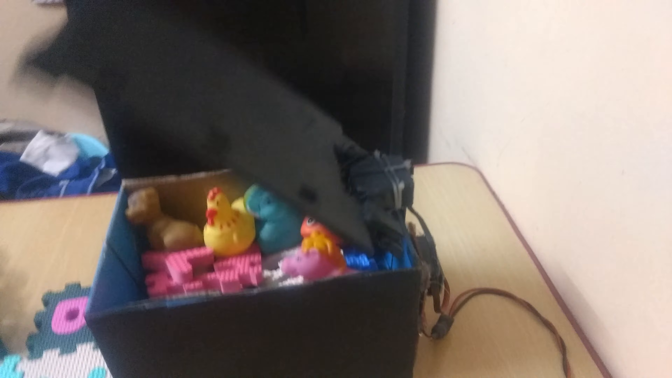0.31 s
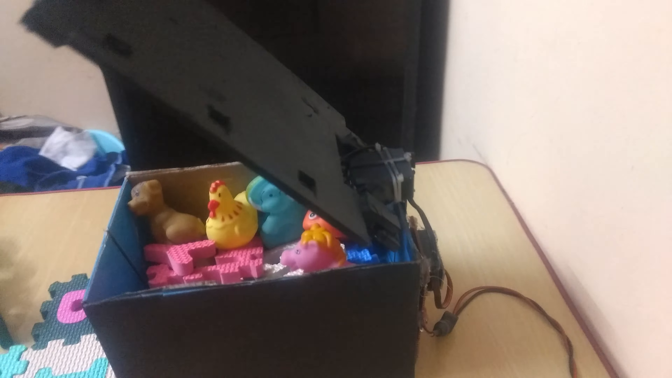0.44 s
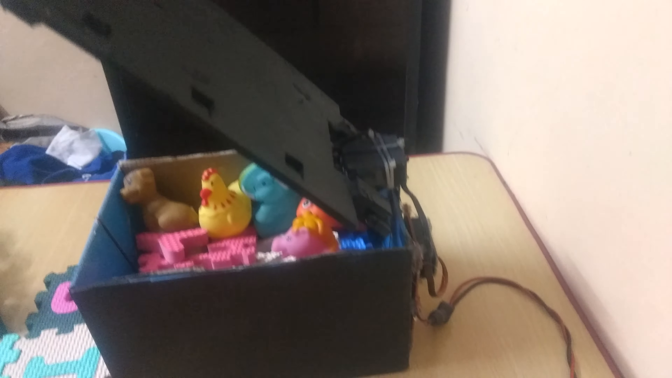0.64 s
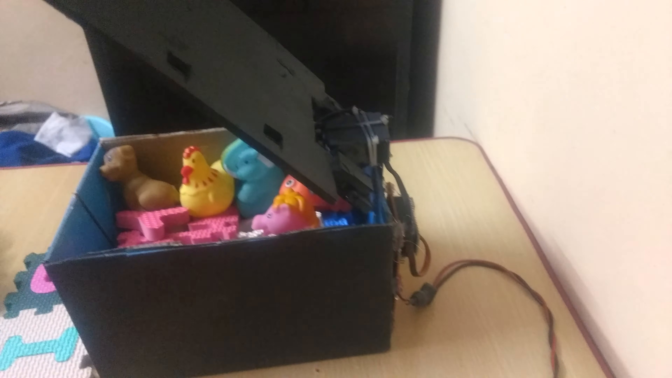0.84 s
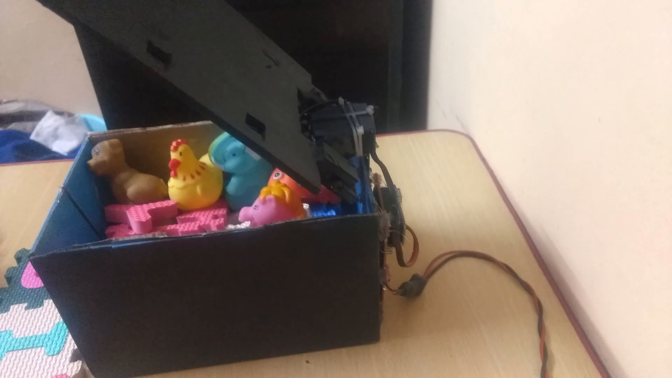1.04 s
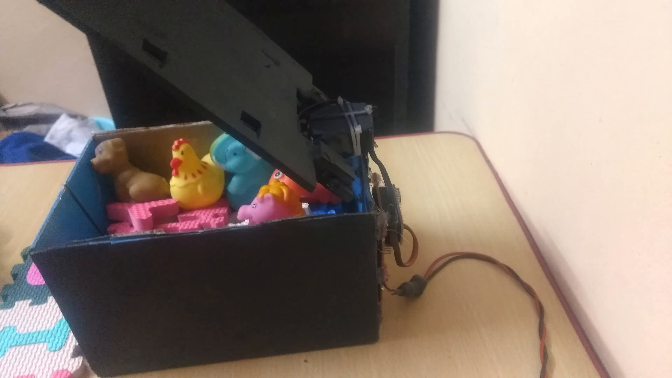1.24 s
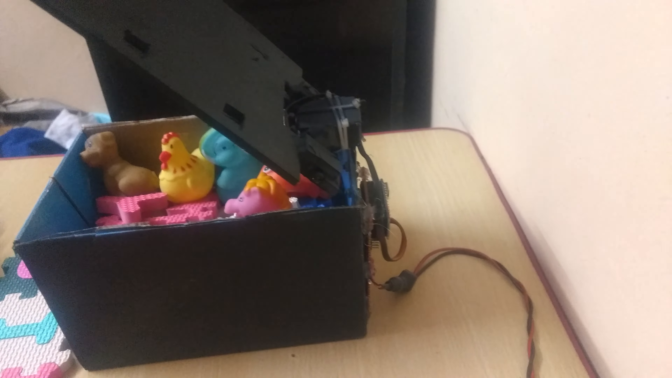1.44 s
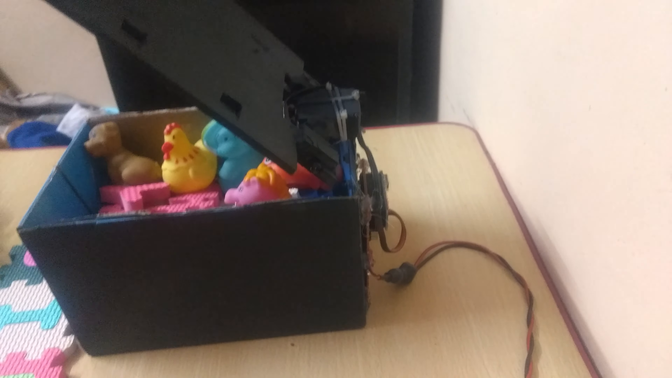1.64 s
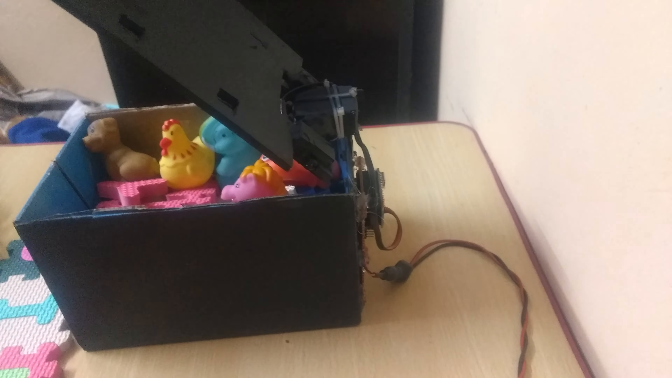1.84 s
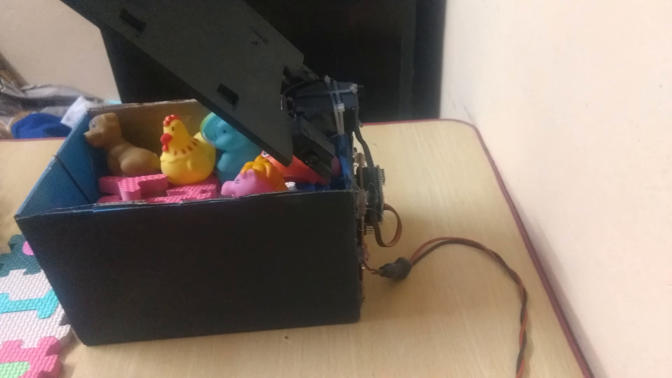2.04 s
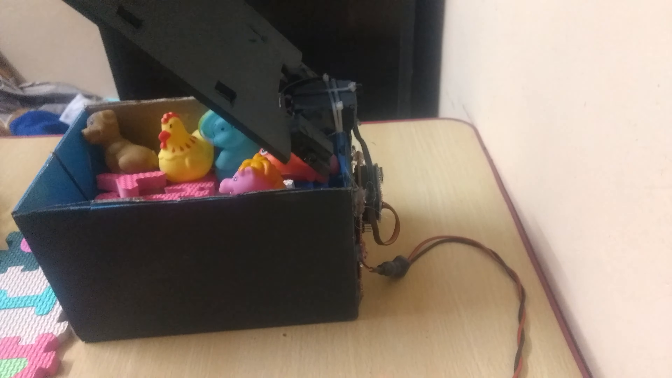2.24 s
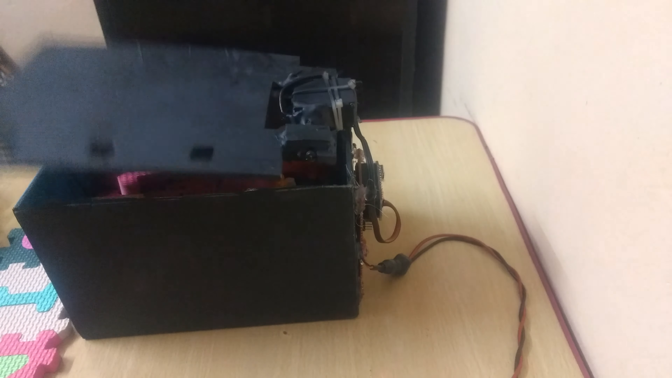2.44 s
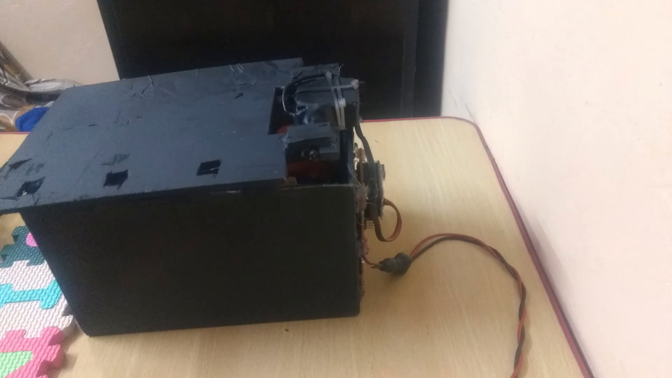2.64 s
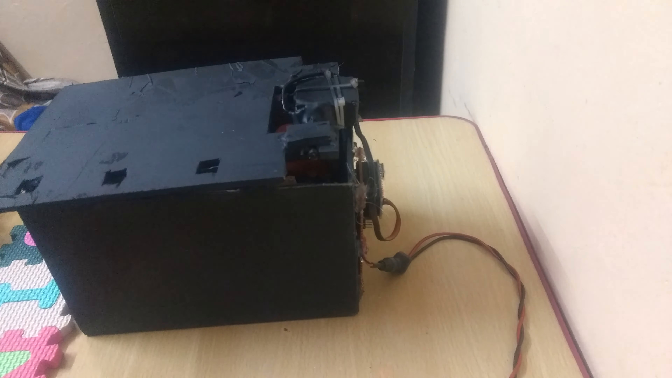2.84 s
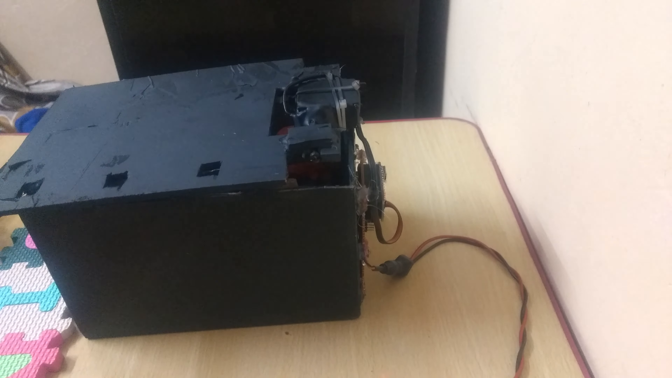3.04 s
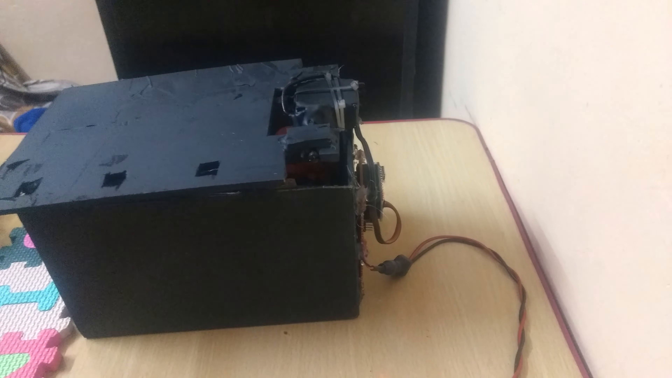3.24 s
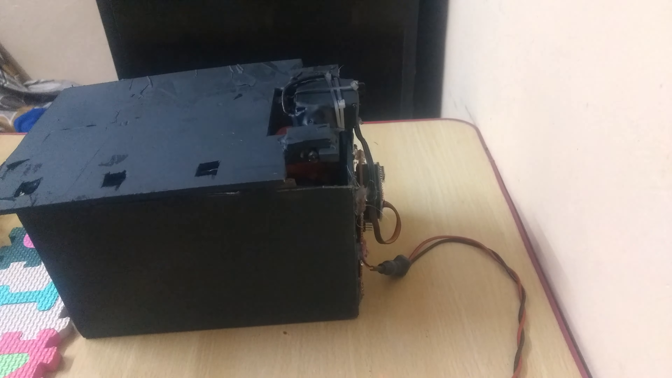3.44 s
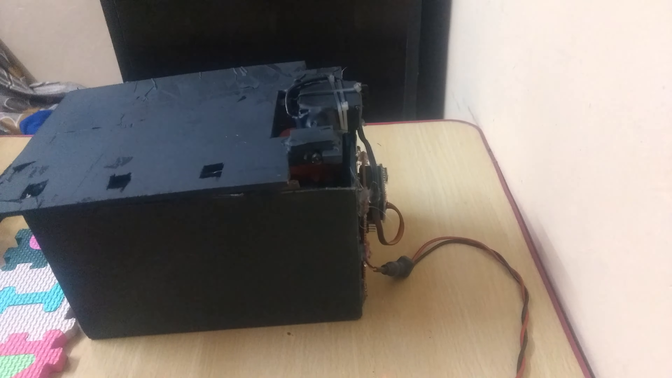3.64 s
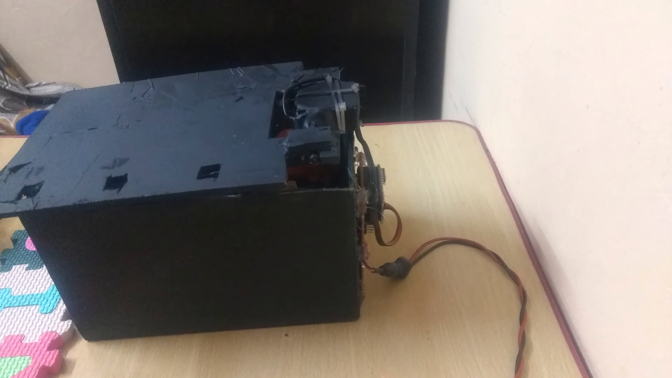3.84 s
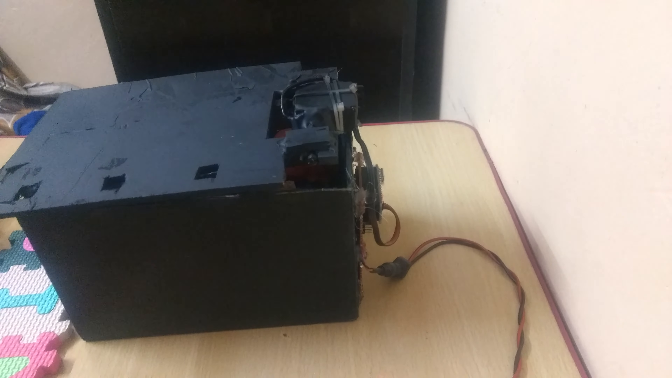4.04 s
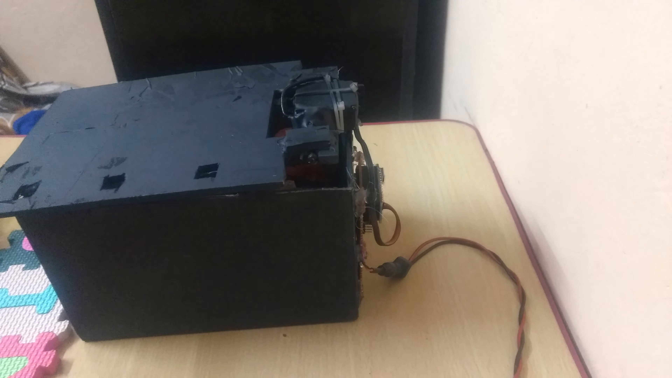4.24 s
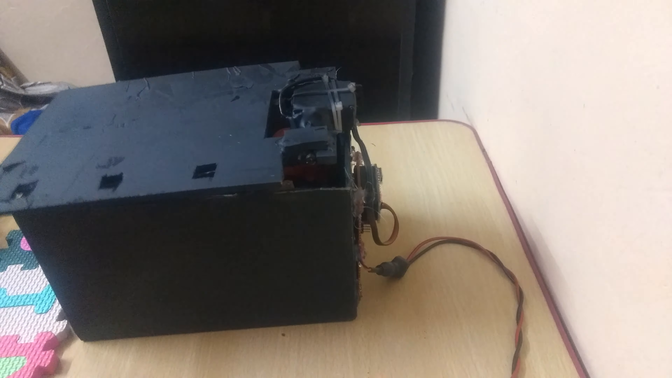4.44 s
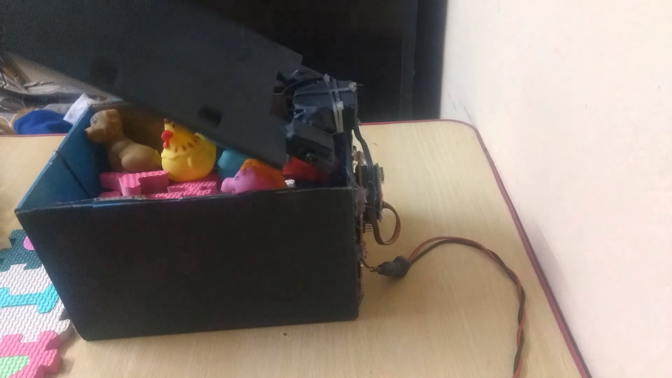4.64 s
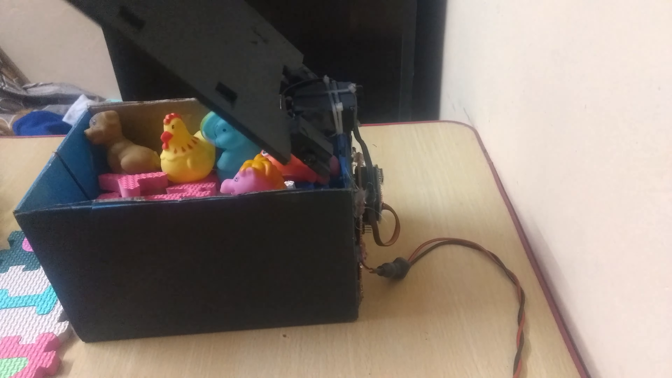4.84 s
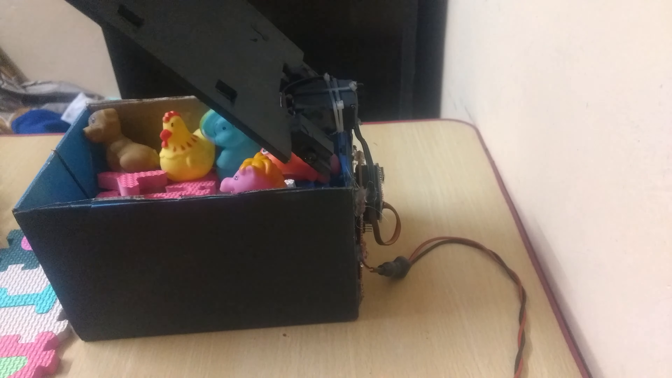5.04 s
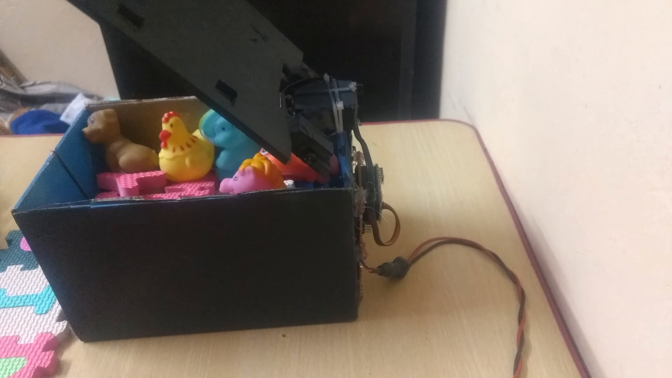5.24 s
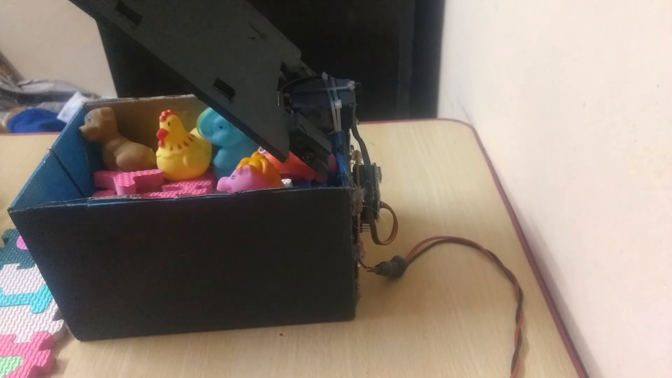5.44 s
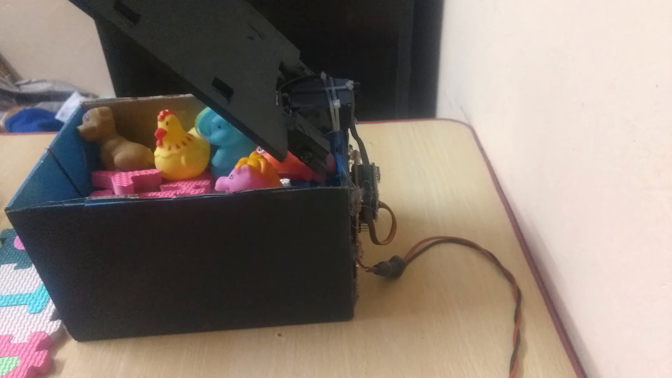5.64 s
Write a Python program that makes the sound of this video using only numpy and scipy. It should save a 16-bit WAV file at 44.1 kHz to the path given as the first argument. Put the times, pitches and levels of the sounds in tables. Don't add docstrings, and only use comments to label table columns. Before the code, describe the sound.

A tiny gear motor zips a hollow cardboard box lid at the start, grinds lower in the middle and zips again near the end. Fine, regular hinge ticks follow the first and last bursts. Low fan hum and thin hiss continue throughout, dipping slightly after the louder bursts, captured close by a phone in a small room.

```python
import sys
import numpy as np
from scipy import signal
from scipy.fft import rfft, irfft, next_fast_len
from scipy.io import wavfile
from scipy.ndimage import uniform_filter1d, map_coordinates

SR = 44100
rng = np.random.default_rng(int(sys.argv[2]) if len(sys.argv) > 2 else 0)


def volts(x):
    e = np.asarray(x, float) / 20
    return 10 ** e


def file_out(sig):
    cols = np.atleast_2d(sig).T
    lim = np.clip(cols, -1, 1)
    pcm = np.round(lim * 32767).astype(np.int16)
    wavfile.write(sys.argv[1], SR, pcm)


N = 251362

# [t/s, rasp level/dB]
EFFORT = [
    [(.07, -60), (.084, -40), (.124, -26), (.17, -26.5), (.215, -36), (.25, -34), (.325, -32.5),
     (.42, -45.5), (.56, -82)],
    [(2.27, -73), (2.28, -41), (2.306, -34), (2.372, -41.5), (2.4, -37), (2.416, -27.5), (2.47, -31),
     (2.575, -38), (2.76, -95)],
    [(4.47, -91), (4.478, -44.5), (4.516, -24), (4.566, -26), (4.61, -35), (4.64, -31.5), (4.75, -31),
     (4.79, -39.5), (4.97, -76.5)],
]
# [f/Hz, likeness/-1..1, phase lead of the first/rad,
# first over second for the room/dB, the same for the servo/dB]
PORTS = [(40, .99, .16, 1.7, 1.7), (90, .985, .19, .8, .8), (170, .995, .17, -.2, -.2),
         (300, .94, .17, -2.4, -2.5), (550, .88, .2, -2.2, -3.5), (950, .45, .2, -2.5, -1.6),
         (1600, -.2, 0, -1, 0), (3000, 0, 0, -1, -1), (7000, 0, 0, -1.5, -1), (11000, 0, 0, -4, -5),
         (15000, 0, 0, -3, -18)]


def servo():
    # [f/Hz, level/dB per Hz]
    case_spectrum = [(1100, -120), (1200, -4), (1450, -7), (1650, 3.5), (1900, -2), (2150, 2), (2600, -1),
                     (3200, -6.5), (4300, -10), (5500, -8.5), (6500, -13.5), (8000, -16), (9000, -29),
                     (10000, -120)]
    # [f/Hz, level/dB per Hz]
    sizzle_spectrum = [(7500, -120), (8500, -3), (9500, -15.5), (10500, -8), (13200, -12.5), (14000, -8),
                       (15500, -4)]
    # [f/Hz, width/Hz, level/dB]
    box_walls = [(514.4, 15.5, 5.5), (670.6, 58, 4.5), (808, 176, -4.5), (937, 32, 0.5), (1076, 94, -5.5)]
    rasp_db, = curves(EFFORT)
    age, mesh_hz, pull, top_hz, whine_db, drum_db = motor()

    lumps = volts(2 * wobble(350) + 1.2 * wobble(60))
    grit = lambda: lumps * rng.standard_normal((2, N))
    labour_khz = (top_hz.max() - top_hz) / 1000
    sizzle_db = -14.5 + 3 * pull + 5.5 * labour_khz
    rasp = coloured(grit(), case_spectrum) + volts(sizzle_db) * coloured(grit(), sizzle_spectrum)

    box_db = drum_db - 4 - pull + 10 * (age - .2) - 0.66 * np.clip(rasp_db + 33, 0, None)
    drum = volts(box_db + 1.1 * wobble(70)) * resonant(grit(), box_walls)

    gears_db = rasp_db + 3 - 2.5 * pull
    gears = volts(gears_db) * (rasp + drum)
    return swinging(EFFORT, fall_s=.05) * (gears + whine(mesh_hz, pull, rasp_db + whine_db + 2 * pull))


def motor():
    # [motor starts t/s, brakes t/s, mesh pitch it heads for f/Hz]
    swings = [
        (.085, .26, 1720),
        (2.275, 2.52, 920),
        (4.485, 4.7, 1700),
    ]
    # [whine re rasp/dB, box drumming re rasp/dB]
    loads = [
        (-4.5, -4.5),
        (-2, 1),
        (-6.5, 0),
    ]
    spin_up_s, creep_hz_per_s, sag_hz_per_s = .042, 700, 3800
    pull_s, pull_hz = 0.13, 1400
    t = np.arange(N) / SR
    rows = np.hstack([swings, loads])
    current = np.clip(np.searchsorted(rows[:, 0], t) - 1, 0, None)
    start, brake, top_hz, whine_db, drum_db = rows[current].T
    age = np.clip(t - start, 0, None)
    run_up = top_hz * (1 - np.exp(-age / spin_up_s))
    mesh_hz = run_up + creep_hz_per_s * age - sag_hz_per_s * np.clip(t - brake, 0, None)
    pull = (top_hz > pull_hz) * np.clip((pull_s - age) / .02, 0, 1)
    return np.clip(age, 0, .5), np.clip(mesh_hz, 1, None), pull, top_hz, whine_db, drum_db


def whine(mesh_hz, pull, first_db):
    # [f/Hz, level/dB]
    case_gain = [(700, -20), (1100, -3), (1620, 3), (1900, 1), (2300, 4), (3200, 3), (3500, -10), (6300, 0)]
    # [multiple of the mesh pitch, level re octave/dB]
    overtones = [
        (3, -8),
        (4, -6),
        (5, -17),
    ]
    # [t/s, half length/s, level/dB]
    singing = [
        (.325, .016, 4),
        (2.46, .025, 2),
        (4.62, .03, 3),
        (4.7, .04, 1),
    ]
    t = np.arange(N) / SR
    cruise = 1 - pull
    wavering_hz = mesh_hz * (1 + (.004 + .007 * cruise) * wobble(120))
    phase = 2 * np.pi * np.cumsum(wavering_hz) / SR

    def tone(k, db):
        level = volts(db + along(case_gain, k * mesh_hz))
        flutter = volts(2 * np.array([wobble(60), wobble(60)]))
        return level * flutter * np.sin(k * phase + rng.uniform(0, 2 * np.pi, (2, 1)))

    octave_db = first_db + 1 - 14 * cruise
    fade_db = np.clip(mesh_hz - 1520, 0, None) / 10
    upper = sum(tone(k, octave_db + db - fade_db) for k, db in overtones)
    spells = pull * np.interp(mesh_hz, (500, 1300), (0, 1))
    spells = spells + sum(volts(db) * np.exp(-((t - s) / half) ** 2) for s, half, db in singing)
    return (mesh_hz > 500) * spells * (tone(1, first_db) + tone(2, octave_db) + upper)


def lid():
    # [t/s, peak/dB, body re peak/dB, back-swing peak/dB]
    rock_ticks = [(.486, -53, 1, -58), (.6538, -62, 9, -58), (.8239, -53, 3, -55.5),
                  (1.007, -48.5, -19, -61), (1.1817, -51.5, -18, -75), (1.3527, -49.5, -1, -78),
                  (1.525, -55.5, -16, -78), (4.871, -50, -2, -65), (5.046, -49.5, 0, -57),
                  (5.224, -58, 10, -57), (5.4, -54, -5, -66), (5.5767, -51, -13, -75)]
    # [t/s, peak/dB, body re peak/dB]
    stray_slips = [
        (.4754, -51, -3),
        (0.6876, -61, 16),
        (.847, -58, -9),
        (5.2154, -56, -9),
    ]
    # [t/s, peak/dB, low knock re peak/dB]
    gear_knocks = [(0.0815, -34.5, -6), (0.605, -70, 26), (2.2807, -48, 12), (2.3047, -55, 0),
                   (2.3347, -43, 11), (2.3484, -41, 18), (2.3883, -39, 9), (2.4084, -29, -12),
                   (2.6917, -59.5, 10), (2.8135, -65, 9), (4.4804, -49, 2), (4.9094, -59, 7),
                   (4.9576, -62, 11.5)]
    lead_s, back_s = .017, .093
    rocks = []
    for s, db, body_db, back_db in rock_ticks:
        rocks += [(s - lead_s, -61, -2), (s, db, body_db), (s + back_s, back_db, -2)]
    ticks = clicks(rocks + stray_slips, (6500, 20000), (2500, 5000), top_s=.0029, body_s=.0064, gain_db=8.5)
    return ticks + clicks(gear_knocks, (2500, 9000), (800, 2500), top_s=.015, body_s=.04, gain_db=6)


def clicks(events, top, body, top_s, body_s, gain_db):
    bright, dull = np.zeros((2, N + SR)), np.zeros((2, N + SR))
    t = np.arange(SR // 10) / SR
    for s, db, body_db in events:
        puff = rng.standard_normal((2, 2, len(t)))
        puff = puff / np.sqrt(np.mean(puff[..., :SR // 1000] ** 2, -1, keepdims=True))
        span = slice(round(s * SR), round(s * SR) + len(t))
        bright[:, span] += volts(db + gain_db - 60 * t / top_s) * puff[0]
        dull[:, span] += volts(db + body_db + gain_db - 60 * t / body_s) * puff[1]
    return filtered(bright[:, :N], band(*top)) + filtered(dull[:, :N], band(*body))


def room():
    # [f/Hz, level/dB per Hz]
    fan_spectrum = [(25, -41), (38, -26), (50, -12), (65, -20), (100, -6.5), (130, -15), (230, -5.5),
                    (300, -5), (430, -15), (550, -8), (750, -9), (1300, -19), (2200, -24.5), (4000, -120)]
    # [f/Hz, width/Hz, level/dB]
    housing = [(170.9, 38.2, 0)]
    # [t/s, level/dB]
    hum_swells = [(.13, -50), (1.03, -44), (2.16, -46), (2.428, -35), (3.98, -42), (4.54, -44.5), (4.7, -48),
                  (5.46, -44), (5.56, -42)]
    # [f/Hz, level/dB per Hz]
    air_spectrum = [(700, -120), (1200, -18), (1800, 4), (2500, 2.5), (3200, -1.5), (4500, -12.5),
                    (6500, -32), (9000, -51), (12000, -120)]
    # [f/Hz, level/dB per Hz]
    hiss_spectrum = [(2000, -120), (4000, -3), (5000, -4), (6400, -8), (7100, -2), (7500, -4), (8000, -11),
                     (9500, -14), (11500, -13), (13500, -10), (15500, -8)]
    t, duck_db = np.arange(N) / SR, ducking()
    noise = lambda: rng.standard_normal((2, N))
    rush = volts(-44 + duck_db + 0.73 * wobble(8)) * coloured(noise(), fan_spectrum)

    carrier = resonant(resonant(noise(), housing), housing)
    power = np.abs(uniform_filter1d(np.mean(carrier ** 2, 0), SR // 15))
    steady = carrier / np.sqrt(0.16 + power)
    throb = volts(-45 + duck_db + 2 * wobble(15))
    throb = throb + sum(volts(db) * np.exp(-((t - s) / 0.024) ** 2) for s, db in hum_swells)
    hum = filtered(volts(0.5) * throb * steady, band(80, 310))

    air = volts(-61 + 0.62 * duck_db + .6 * wobble(12)) * coloured(noise(), air_spectrum)
    hiss = volts(-70.275 + 0.51 * duck_db) * coloured(noise(), hiss_spectrum)
    return rush + hum + air + hiss


def ducking():
    lost_db = [7.5, 7.5, 1]
    recover_s = 0.28
    t, gain_db = np.arange(N) / SR, np.zeros(N)
    for rows, db in zip(EFFORT, lost_db):
        a, b = rows[0][0], rows[-1][0]
        gain_db -= db * np.clip((t - a) / (b - a), 0, 1) * np.exp(-np.clip(t - b, 0, None) / recover_s)
    return gain_db


def far():
    # [t/s, level/dB, low f/Hz, high f/Hz, t60/s]
    distant = [
        (.655, -54, 6500, 9000, .7),
        (1.606, -46, 1000, 5000, .35),
        (1.607, -49, 2200, 5000, 1.8),
        (1.606, -62, 10000, 14000, .6),
        (1.62, -49, 900, 3500, .2),
        (1.701, -44, 450, 1700, .06),
        (3.134, -45, 450, 1700, .06),
        (4.097, -43, 450, 1700, .06),
    ]
    t, lumps_db = np.arange(N) / SR, 2.5 * wobble(70)
    sound = np.zeros((2, N))
    for s, db, lo_hz, hi_hz, t60 in distant:
        level = (t > s) * volts(db + lumps_db - 60 * np.abs(t - s) / t60)
        tail = level * rng.standard_normal((2, N))
        sound += filtered(tail, lambda hz: band(lo_hz, hi_hz)(hz) ** 2)
    return sound


def whistles():
    # [f/Hz, level/dB]
    leaks = [(2900, -82), (10002, -97), (13582, -99), (14002, -94)]
    t, sound = np.arange(N) / SR, np.zeros((2, N))
    for hz, db in leaks:
        level = np.sqrt(2) * volts(db + 0.91 * wobble(3.1))
        sound += level * np.sin(2 * np.pi * hz * t + rng.uniform(0, 2 * np.pi, (2, 1)))
    return sound


def ports(pair, col):
    turn = lambda hz: np.arccos(np.clip(along(PORTS, hz), -1, 1)) / 2
    mid, side = filtered(pair, lambda hz: np.array([np.cos(turn(hz)), np.sin(turn(hz))]))
    half = np.array([[.5], [-.5]])
    level = lambda hz: volts(half * along(PORTS, hz, col=col))
    lead = lambda hz: np.exp(1j * half * along(PORTS, hz, col=2))
    return filtered(np.array([mid + side, mid - side]), lambda hz: level(hz) * lead(hz))


def swinging(tables, fall_s):
    t, gate = np.arange(N) / SR, np.zeros(N)
    for rows in tables:
        gate += np.clip((t - rows[0][0]) / .008, 0, 1) * np.clip((rows[-1][0] - t) / fall_s, 0, 1)
    return np.clip(gate, 0, 1)


def unit(x):
    return x / np.sqrt(np.mean(x ** 2) + 1e-20)


def along(points, hz, col=1):
    rows = np.asarray(points, float)
    return np.interp(np.log(hz + 1), np.log(rows[:, 0] + 1), rows[:, col])


def curves(tables):
    s, *cols = np.vstack(tables).T
    return [np.interp(np.arange(N) / SR, s, c) for c in cols]


def wobble(rate):
    return map_coordinates(rng.standard_normal(int(N * rate / SR) + 4), [np.arange(N) * rate / SR])


def filtered(x, response):
    m = next_fast_len(N + 8192)
    return irfft(rfft(x, m) * response(np.fft.rfftfreq(m, 1 / SR)), m)[..., :N]


def coloured(x, spectrum):
    return unit(filtered(x, lambda hz: volts(along(spectrum, hz))))


def resonant(x, modes):
    def response(f):
        total = 0
        for k, (centre, width, db) in enumerate(modes):
            damping = 1j * f * width
            total = total + (-1) ** k * volts(db) * damping / (centre ** 2 - f ** 2 + damping)
        return total
    return unit(filtered(x, response))


def band(lo_hz, hi_hz):
    return lambda hz: 1 / np.sqrt((1 + (lo_hz / (hz + 1)) ** 4) * (1 + (hz / hi_hz) ** 4))


def scene():
    near = ports(servo() + lid(), col=4)
    return near + ports(room() + far() + whistles(), col=3)


def roll_off(x):
    return signal.sosfilt(signal.butter(12, 16480, fs=SR, output="sos"), x)


def record(dry):
    # [f/Hz, share of the other port taken off]
    widening = [(700, .7), (2000, .82), (4000, .68), (7000, .6), (8900, .78), (11000, .55), (15000, .4)]
    offset = [
        [.0068],
        [-.0002],
    ]
    delay_s, top_hz = 20 / 44100, 15780
    share = lambda hz: along(widening, hz)
    late = filtered(dry[::-1], lambda hz: share(hz) * np.exp(-2j * np.pi * hz * delay_s))

    def makeup(hz):
        alike = along(PORTS, hz) * np.cos(2 * np.pi * hz * delay_s)
        loss = 1 + share(hz) ** 2 - 2 * share(hz) * alike
        return 1 / (1 + (hz / top_hz) ** 200) / np.sqrt(loss)

    wide = filtered(dry - late, makeup)
    return roll_off(wide + offset)


dry = scene()
out = record(dry)
file_out(out)
```